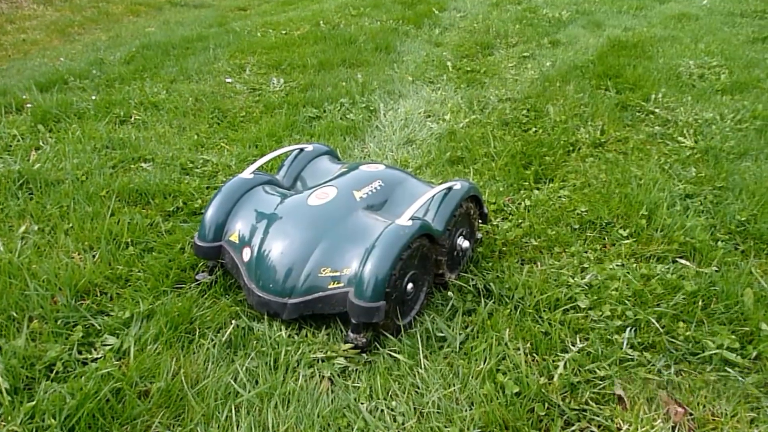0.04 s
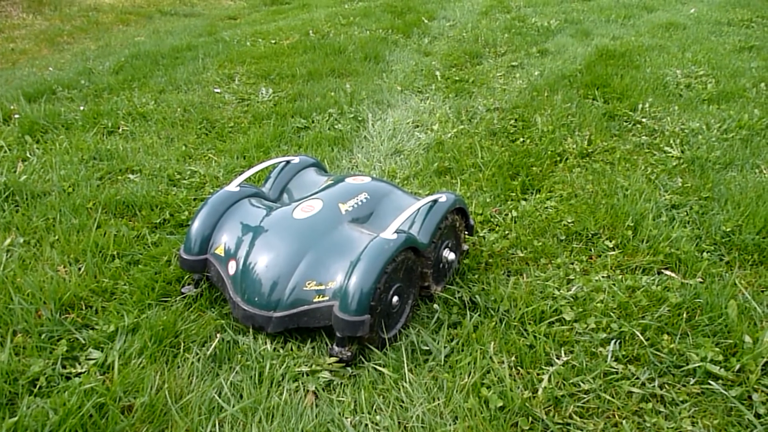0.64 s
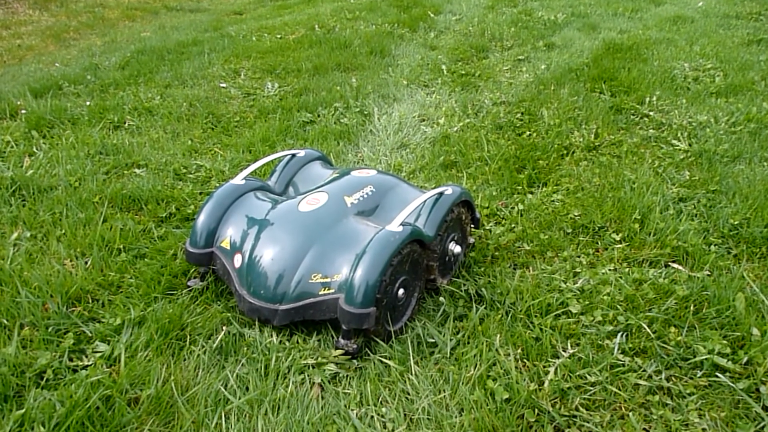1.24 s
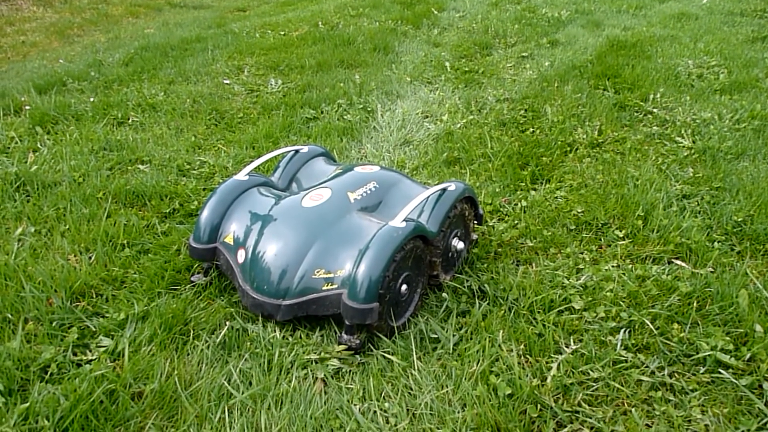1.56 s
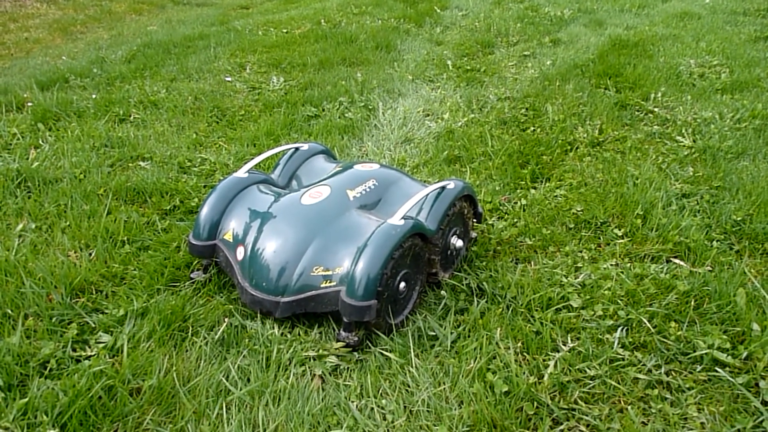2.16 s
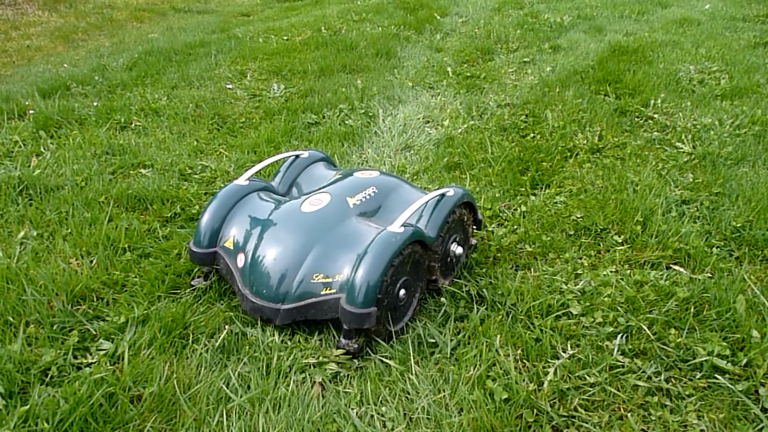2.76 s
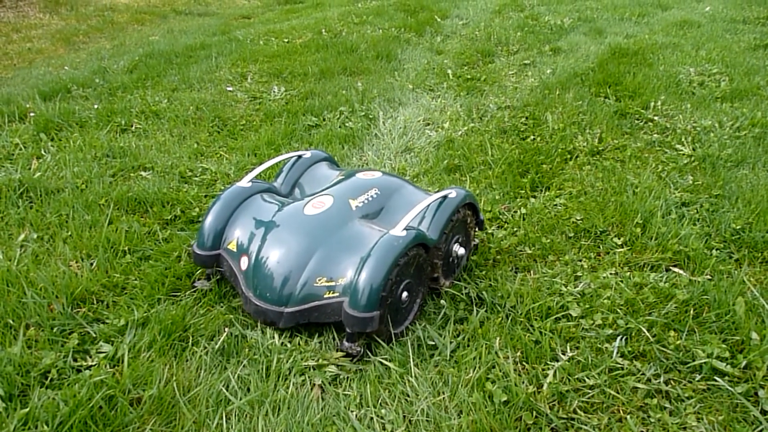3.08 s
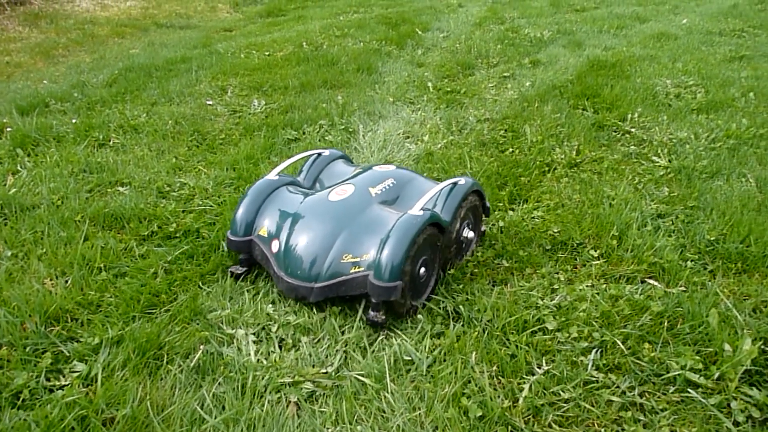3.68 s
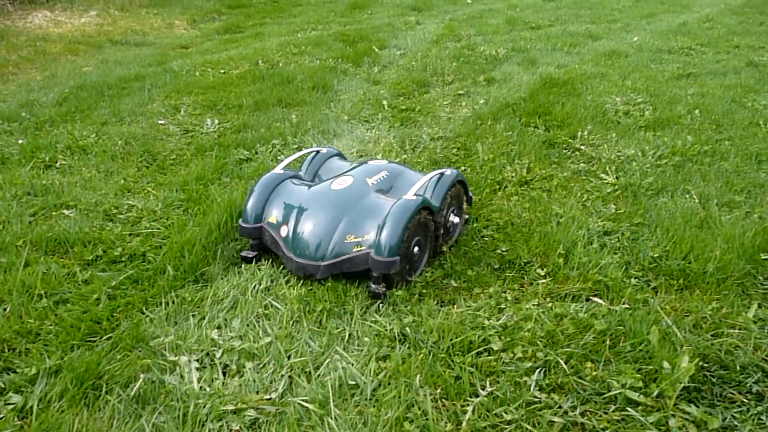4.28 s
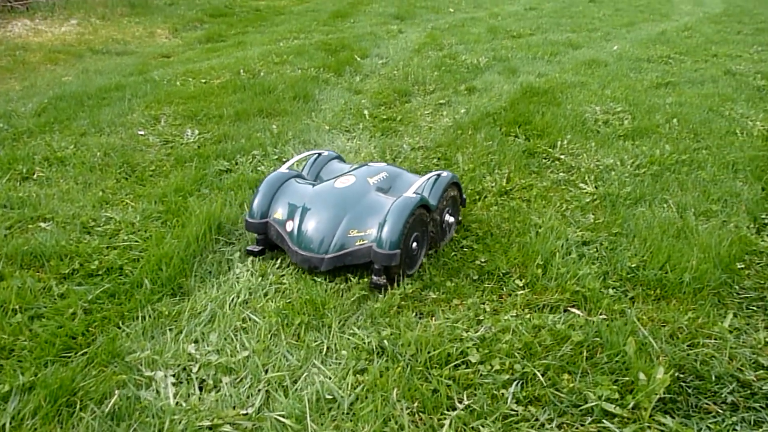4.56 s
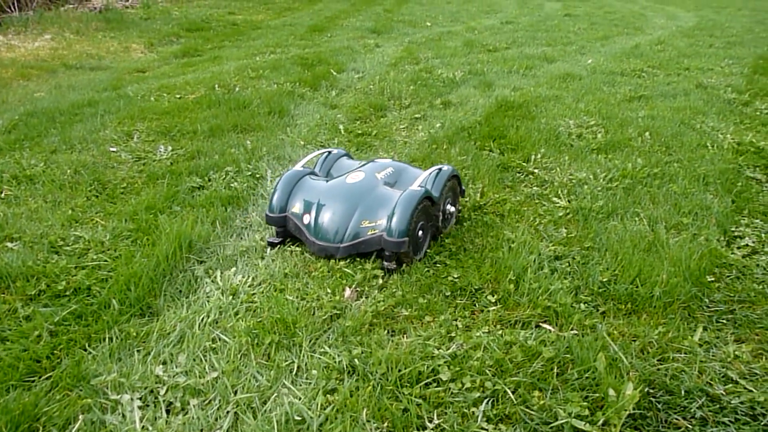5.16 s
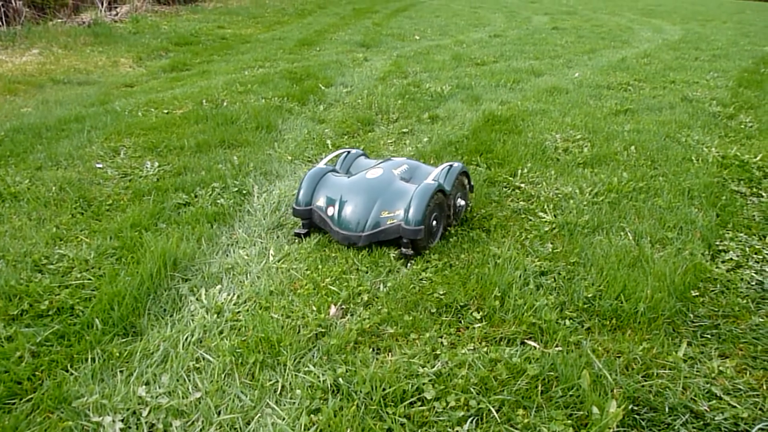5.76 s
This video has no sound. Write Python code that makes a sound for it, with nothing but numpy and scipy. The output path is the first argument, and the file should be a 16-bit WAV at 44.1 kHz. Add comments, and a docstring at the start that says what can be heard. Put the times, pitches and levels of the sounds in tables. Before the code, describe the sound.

Outdoors on a lawn, a single close microphone picks up the spinning blade of a little robot mower, a steady hum with a raspy motor whine, brief high squeals and very faint wheel drives. The mower then pushes into thicker grass, and the hiss of cutting swells in patches as the hum wavers and sags a little. It keeps running, with a dull, gentle bump just before the end.

```python
"""A lawn in the open air, one microphone close to a small robotic mower as it crosses.
From the start its four-armed blade hums over a rush of snipped grass; the motor whines, rasps and now
and then squeals, and the wheel drives whine faintly. After three seconds it reaches longer grass: the
deck brushes in, the blade slows, its hum flutters and the cutting hisses. Near the end comes a soft bump."""
import sys
import numpy as np
from scipy.fft import rfft, irfft, next_fast_len
from scipy.io import wavfile
from scipy.ndimage import uniform_filter1d, map_coordinates

SR = 44100
rng = np.random.default_rng(int(sys.argv[2]) if len(sys.argv) > 2 else 0)


def put_to_file(sound):
    """Save the sound as 16-bit audio at rate SR, in the file named by the first command-line argument."""
    columns = np.atleast_2d(sound).T  # one column per channel
    safe = np.clip(columns, -1, 1)
    whole_steps = np.round(safe * 32767)
    wavfile.write(sys.argv[1], SR, whole_steps.astype(np.int16))


N = 261006


def amp(db):
    """Decibels to gain."""
    return 10 ** (np.asarray(db) / 20)


def unit(x):
    """Scale to rms 1."""
    return x / np.sqrt(np.mean(x ** 2) + 1e-20)


def curve(rows):
    """(t/s, value) rows joined by straight lines, one value a sample."""
    return np.interp(np.arange(N) / SR, *np.transpose(rows))


def swells(events):
    """(middle t/s, length/s, size, ..) rows as arches that rise and fall: one curve a size column."""
    middle, length, *sizes = np.transpose(events)
    position = (np.arange(N) / SR - middle[:, None]) / length[:, None]
    return np.array(sizes) @ np.cos(np.pi * np.clip(position, -.5, .5))


def wobble(rate, steps=6):
    """A smooth random curve, rate knots a second."""
    knots = rng.standard_normal(int(N * rate / SR) + 4)
    at = np.arange((len(knots) - 1) * steps) / steps
    return np.interp(np.arange(N) * rate / SR, at, map_coordinates(knots, [at]))


def filtered(x, response):
    """x times a response of frequency."""
    size = next_fast_len(N + SR // 2)
    return irfft(rfft(x, size) * response(np.fft.rfftfreq(size, 1 / SR)), size)[:N]


def coloured(x, points):
    """x through a (f/Hz, level/dB) spectrum, at rms 1."""
    hz, db = np.transpose(points)
    return unit(filtered(x, lambda f: amp(np.interp(np.log(f + 1), np.log(hz), db))))


def pulses(at, sizes):
    """Clicks at fractional sample positions."""
    taps = np.floor(at)[:, None] + np.arange(-7, 9)
    lag = taps - at[:, None]
    shape = np.sinc(lag) * np.sinc(lag / 8)
    inside = (taps >= 0) & (taps < N)
    return np.bincount(taps[inside].astype(int), (sizes[:, None] * shape)[inside], N)


def shaft_tone(multiple, turns):
    """A sine locked to a multiple of the shaft speed, at a random phase."""
    return np.sin(2 * np.pi * (multiple * turns + rng.random()))


def open_air(load):
    """Quiet, low outdoor noise over the lawn, slightly louder while the mower is in long grass."""
    # spectrum of the air: f/Hz, relative level/dB
    spectrum = [(20, -48), (32, -19), (45, -17), (70, 6.5), (110, 1.5), (180, 2.5), (400, 1.5), (800, -3),
                (1500, -34), (4000, -2), (15000, -26)]
    return amp(-45.5 + 1.1 * load + 1.1 * wobble(4.85)) * coloured(rng.standard_normal(N), spectrum)


def blade(turns, load, sag, tuft_db, steady_flutter=0.0021):
    """Four arms hum; grass striking them shakes the higher harmonics most."""
    # blade-pass harmonics: shaft multiple, relative level/dB free and in long grass, flutter at full load
    harmonics = [(4, -3.5, -8, 0.17), (8, 1.5, 1, 0), (12, -7, -6.5, 0.54), (16, 1, -.5, .15),
                 (20, -3, -13, 0.38), (24, -14.5, -11, 0.66), (28, -9.5, -6.5, 0.38), (32, -19, -20.5, 1),
                 (36, -21, -15.5, .7), (40, -17, -25.5, 0.7)]
    # tones of the rotor's imbalance: shaft multiple, relative level/dB
    imbalance = [(1, -28), (2, -26), (6, -14), (9, -22.5), (10, -22), (11, -18.5), (13, -21), (15, -20.5),
                 (17, -28), (18, -27), (26, -39), (34, -39), (43, -19.5)]
    hum = np.zeros(N)
    for multiple, free_db, loaded_db, flutter in harmonics:
        shake = (steady_flutter + flutter * load) * (wobble(34) + 1j * wobble(34))
        cycle = np.exp(2j * np.pi * (multiple * turns + rng.random()))
        hum += amp(free_db + load * (loaded_db - free_db)) * np.real((1 + shake) * cycle)
    for multiple, db in imbalance:
        hum += amp(db - 2 * load + 2 * wobble(6)) * shaft_tone(multiple, turns)
    hum_db = -33 + .5 * load - .69 * sag + tuft_db
    return np.sqrt(2) * amp(hum_db) * hum


def grass(turns, load, sag, tuft_db, snap_db=3.0, chop=0.24, patchy_db=1.4):
    """Each passing arm snips stalks: a coarse rush under the deck and, in long grass, a crackling hiss."""
    # spectrum of the rush under the deck: f/Hz, relative level/dB
    rush_spectrum = [(100, -21), (300, -4), (560, -5), (780, 1.5), (950, 0), (1250, 1.5), (1480, -2),
                     (1800, 1.5), (2200, 1), (2740, -2.5), (2890, -47), (3040, -0.5), (4500, -2),
                     (7000, -13.5)]
    # spectrum of the snipped stalks: f/Hz, relative level/dB
    hiss_spectrum = [(4000, -14), (5700, -4), (6200, 0), (7000, -4), (8500, -2), (9300, 0), (10300, -4.5),
                     (11300, -2), (12400, -5), (13500, 2), (14500, -4), (15800, -7)]
    passes = 1 + chop * np.cos(2 * np.pi * 4 * turns)
    rush = coloured(passes * amp(1.5 * wobble(300)) * rng.standard_normal(N), rush_spectrum)
    snips = coloured(passes * amp(snap_db * wobble(2500)) * rng.standard_normal(N), hiss_spectrum)
    patches_db = patchy_db * load * wobble(18)  # long grass stands unevenly
    rush_db = -42 + 13.5 * load - .47 * sag + .21 * tuft_db
    hiss_db = -48.5 + 13.5 * load - .54 * sag + tuft_db + 1.5 * wobble(70)
    return amp(patches_db) * (amp(rush_db) * rush + amp(hiss_db) * snips)


def contacts(turns, rough, scatter_db=0.5, uneven_db=1.5, jitter_samples=0.64, count=36):
    """Rubbing contacts recur every half turn: clicks, plus friction puffs with rough of the power."""
    angles = (np.arange(count) + rng.random(count)) / count / 2
    angles = np.concatenate([angles, angles + .5])
    signs = np.tile(rng.choice([-1, 1], count), 2)
    pattern = signs * amp(uneven_db * rng.standard_normal(2 * count))
    at_turn = np.arange(int(turns[-1]) + 1)[:, None] + angles
    sizes = pattern * amp(scatter_db * rng.standard_normal(at_turn.shape))
    heard = at_turn < turns[-1]
    at = np.interp(at_turn, turns, np.arange(N)) + jitter_samples * rng.standard_normal(at_turn.shape)
    clicks = unit(pulses(at[heard], sizes[heard]))
    envelope = np.sqrt(np.abs(uniform_filter1d(clicks ** 2, size=14)))
    puffs = unit(envelope * rng.standard_normal(N))
    return np.sqrt(1 - rough) * clicks + np.sqrt(rough) * puffs


def motor(turns, load, sag, rattle=0.11):
    """The motor rubs as it turns, less regularly under load; its whine grows with speed."""
    # how hard the motor rubs, which rasp and whine both follow: t/s, level/dB
    rubbing = [(0, -36.5), (.42, -32), (.58, -34.5), (1.5, -31), (2.0, -31), (2.35, -30), (2.9, -30),
               (2.97, -33), (3.3, -30.5), (4.3, -31.5), (4.42, -34), (5.13, -37.5), (5.45, -34),
               (5.92, -39.5)]
    # spectrum of the rasp: f/Hz, relative level/dB
    rasp_spectrum = [(1500, -26.5), (2750, -8.5), (2890, -13), (3000, -2), (3600, 1), (4400, -1),
                     (5100, -3), (5900, -10), (7400, -9.5), (8500, -15), (9400, -10.5), (10500, -17),
                     (13500, -18.5), (15200, -43)]
    # partials of the whine: shaft multiple, relative level/dB
    partials = [(44, -11), (46, -9), (49, -10.5), (50, -7.5), (52, -11), (53, -11), (56, -10.5),
                (61, -12.5), (64, -8.5), (66, -11), (68, -13.5), (69, -14), (70, -13), (71, -15), (91, -21),
                (100, -20), (112, -22), (148, -27)]
    rub = contacts(turns, rough=.42 + .5 * load)
    rub *= 1 + rattle * (1 - load) * np.cos(2 * np.pi * turns)  # the rotor presses harder on one side
    whine = sum(amp(db + 1.2 * wobble(10)) * shaft_tone(multiple, turns) for multiple, db in partials)
    motor_db = curve(rubbing) + 3
    rasp_db = motor_db - 1.5 * load
    whine_db = motor_db - 9 * load - 2.5 * sag
    return amp(rasp_db) * coloured(rub, rasp_spectrum) + amp(whine_db) * whine


def wheels(shaft_hz):
    """The drive gears whine faintly, speeding up and slowing with the blade."""
    # gear tones: f/Hz at top speed, level/dB
    gears = [(371.5, -55), (385, -64.5), (743, -57.5), (990, -60.5)]
    run = np.cumsum(shaft_hz / shaft_hz.max()) / SR
    whine = np.zeros(N)
    for hz, db in gears:
        whine += amp(db + 4 * wobble(5)) * np.sin(2 * np.pi * hz * run + .5 * wobble(6))
    return np.sqrt(2) * whine


def singing(modes, turns, load, throb=0.14, rough=0.086, drift_rad=0.7, waver_db=1.5):
    """Modes kept singing by friction, at rms 1; the grip tightens once a turn."""
    tone = np.zeros(N)
    for hz, free_db, loaded_db in modes:
        phase = 2 * np.pi * hz * np.arange(N) / SR + drift_rad * wobble(24)
        tone += amp(free_db + load * (loaded_db - free_db) + waver_db * wobble(30)) * np.sin(phase)
    tone *= 1 + throb * np.cos(2 * np.pi * turns) + rough * wobble(300)
    power = np.abs(uniform_filter1d(tone ** 2, size=4096))
    return tone / np.sqrt(power + 1e-9)


def squeals(turns, load):
    """Now and then the rubbing catches: a squeal swells and fades in two families of modes."""
    # catches: middle t/s, length/s, low family level/dB, high family level/dB
    catches = [(0.276, 0.17, -37.5, -34), (.41, 0.32, -29.5, -37), (0.739, 0.25, -39, -25.5),
               (1.272, .2, -45, -36), (1.416, 0.21, -44, -28), (1.67, .5, -32, -45), (2.283, .1, -36, -34),
               (3.33, 0.4, -32, -46), (3.484, 0.16, -49, -29), (3.83, 0.13, -51, -23.5),
               (3.92, 0.055, -55, -29.5), (4.24, .3, -58, -31.5), (4.66, .2, -50, -29),
               (4.83, 0.15, -55, -35.5), (5.352, .95, -61, -39)]
    # low family of modes: f/Hz, relative level/dB free and in long grass
    low_modes = [(1705, -13, -30), (3020, 0, 0), (3148, -3, -1), (4205, -3, -25), (4480, -3, -25),
                 (4865, -6, -25), (5130, -6, -14), (5660, -9, -25), (6015, -8, -22)]
    # high family of modes: f/Hz, relative level/dB free and in long grass
    high_modes = [(3397, 1, -14), (3457, 1, -7), (3590, -16, -10), (3662, -1, 0), (4472, -9, -16),
                  (4730, -22, -6)]
    low, high = swells([(s, length, amp(low_db), amp(high_db)) for s, length, low_db, high_db in catches])
    return low * singing(low_modes, turns, load) + high * singing(high_modes, turns, load)


def scrape(deck_hz=1098, width_hz=120, rise_hz_per_s=500):
    """The deck pushes into the long grass with a hollow, rising brush."""
    # grass brushing the deck: middle t/s, length/s, level/dB
    brush = [(3.381, .36, -38.5)]
    middle, length, db = brush[0]
    swell, = swells([(middle, length, amp(db))])
    hz = deck_hz + rise_hz_per_s * (np.arange(N) / SR - middle)
    grain = wobble(width_hz) + 1j * wobble(width_hz)
    note = np.exp(2j * np.pi * np.cumsum(hz) / SR)
    return swell * unit(np.real(grain * note))


def bumps(rise_s=0.0029):
    """Dull, low pushes of a cycle or two, close together."""
    # pushes: start t/s, level/dB, f/Hz
    pushes = [(5.660, -42, 90), (5.702, -36, 85), (5.759, -27.5, 104), (5.792, -37, 70)]
    thud = np.zeros(N)
    for start, db, hz in pushes:
        t = np.maximum(np.arange(N) / SR - start, 0)
        envelope = t / rise_s * np.exp(1 - t / rise_s)
        thud -= amp(db) * envelope * np.sin(2 * np.pi * hz * t)
    return thud


def scene():
    """The mower close by on the lawn, alike in both channels; shaft speed and grass load drive it."""
    # speed of the blade shaft: t/s, f/Hz
    shaft_speed = [(0, 64.65), (.75, 66.7), (1.7, 68.45), (2.3, 68.8), (2.95, 68.85), (3.3, 68.45),
                   (3.6, 67.05), (3.95, 66.5), (4.2, 66.8), (4.4, 66.35), (4.9, 66.65), (5.1, 65.5),
                   (5.6, 63.35), (5.92, 64.7)]
    # load on the blade: t/s, share of it in long grass (0-1)
    long_grass = [(0, 0.18), (2.95, 0.27), (3.15, 0.61), (3.55, 0.92), (4.2, 0.86), (5, 0.81), (5.92, 0.82)]
    # thick tufts in the blade's path: middle t/s, length/s, hiss rise/dB, hum rise/dB
    tufts = [(.36, .35, 4, 0), (3.45, .25, 5.5, .5), (3.78, 0.49, 6, 2), (4.02, .2, 4.5, 1),
             (4.24, .3, 3, 0), (4.85, 0.2, 2.5, 1.5), (5.04, 0.29, 3, 1), (5.5, 0.43, 5, -0.5)]
    shaft_hz, load = curve(shaft_speed), curve(long_grass)
    turns = np.cumsum(shaft_hz) / SR
    sag = shaft_hz.max() - shaft_hz  # turns a second below top speed
    tuft_hiss_db, tuft_hum_db = swells(tufts)
    air = open_air(load)
    cutter = blade(turns, load, sag, tuft_hum_db) + grass(turns, load, sag, tuft_hiss_db) + scrape()
    drive = motor(turns, load, sag) + squeals(turns, load) + wheels(shaft_hz)
    mono = air + cutter + drive + bumps()
    return np.array([mono, mono])


def record(dry):
    """One microphone, with nothing kept above the band limit."""
    top_hz = 15770
    return np.array([filtered(channel, lambda hz: hz < top_hz) for channel in dry])


dry = scene()
out = record(dry)
put_to_file(out)
```